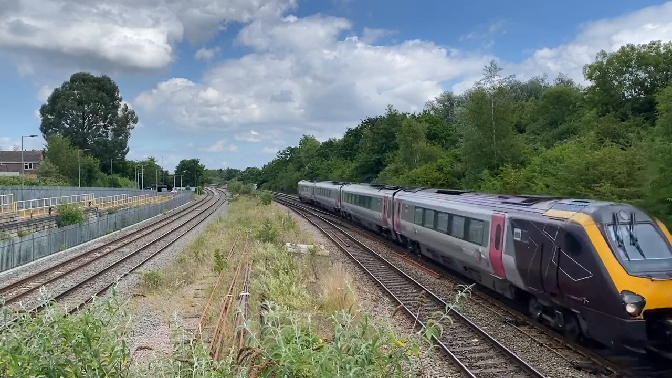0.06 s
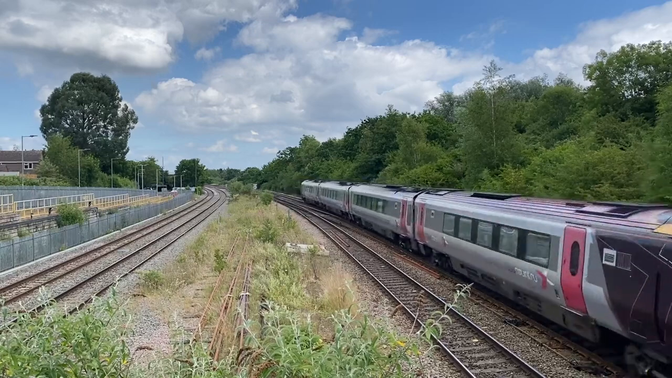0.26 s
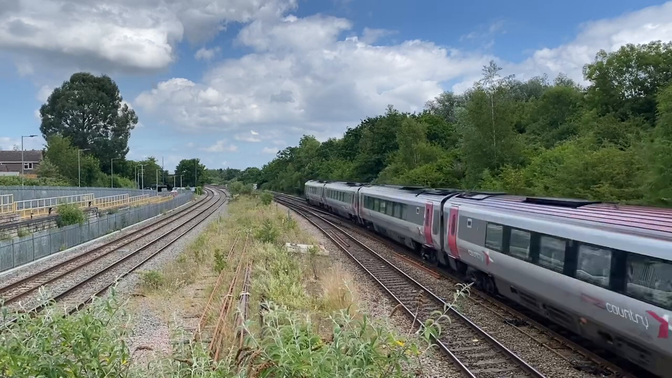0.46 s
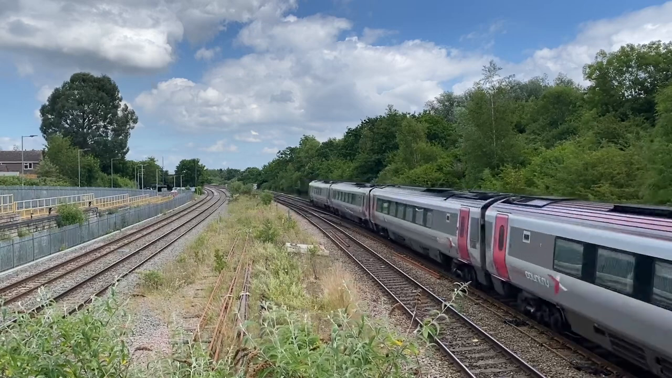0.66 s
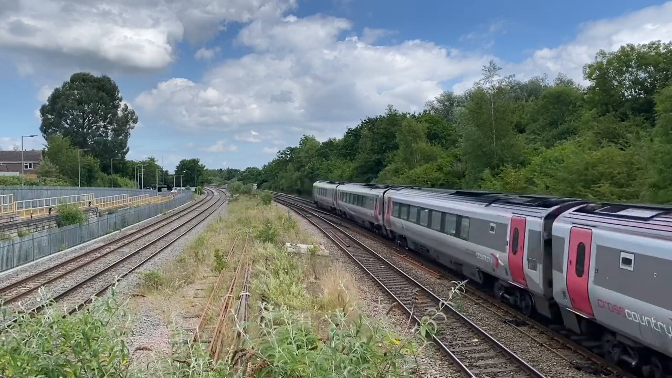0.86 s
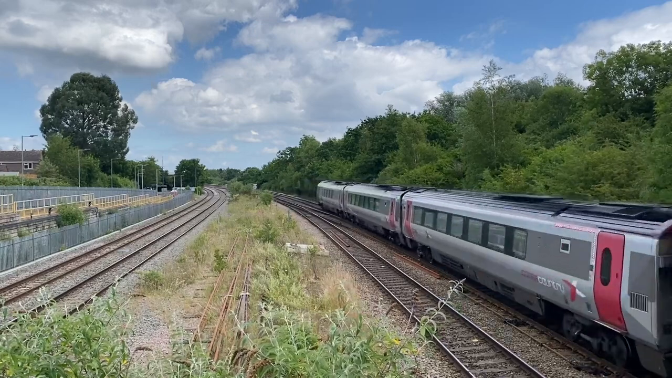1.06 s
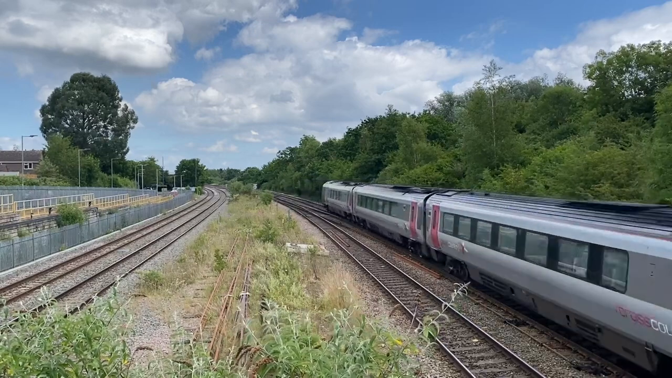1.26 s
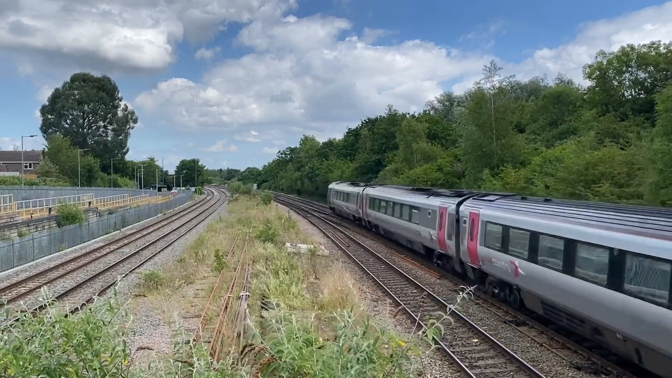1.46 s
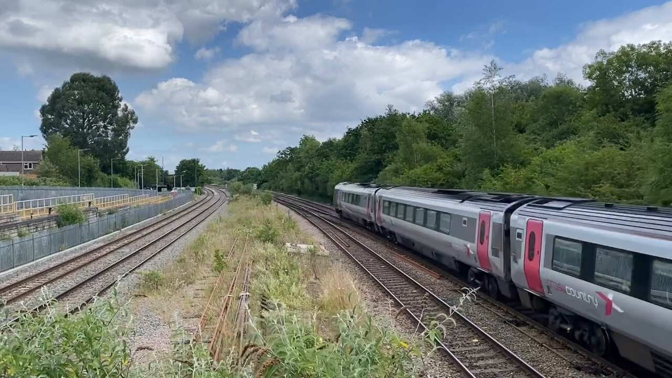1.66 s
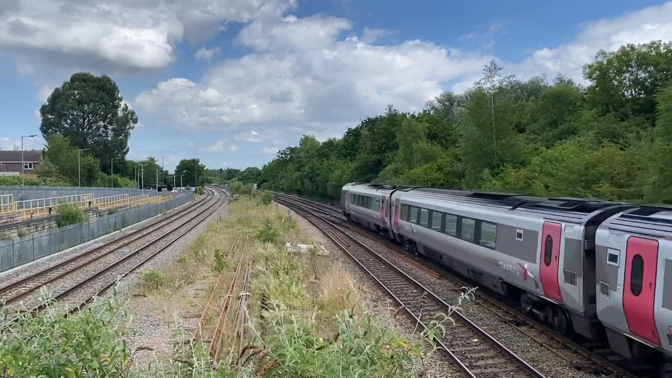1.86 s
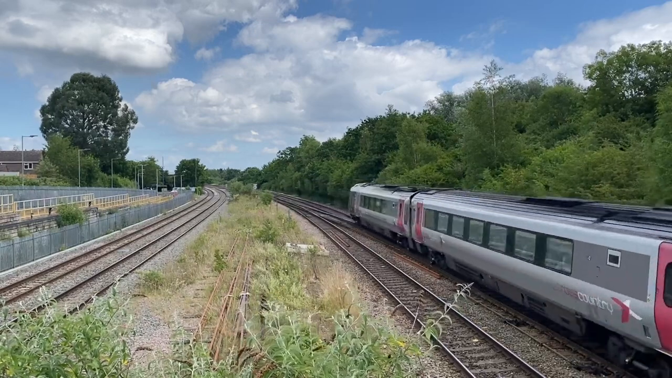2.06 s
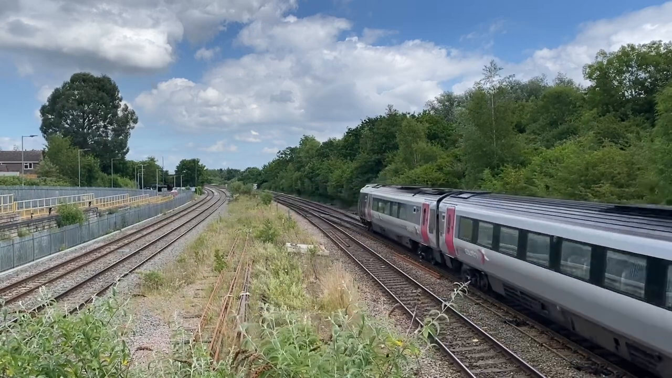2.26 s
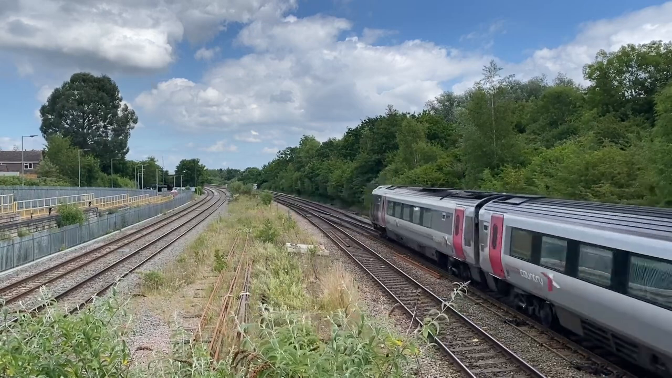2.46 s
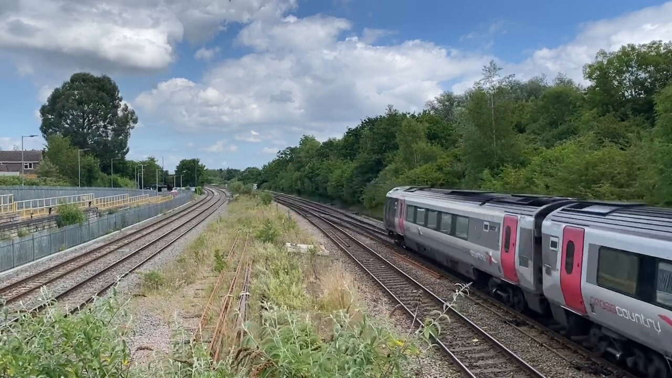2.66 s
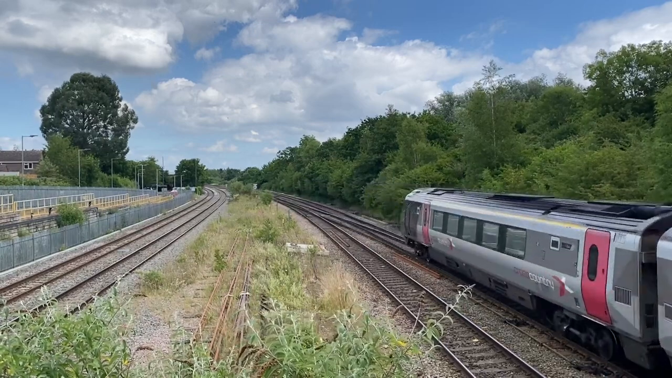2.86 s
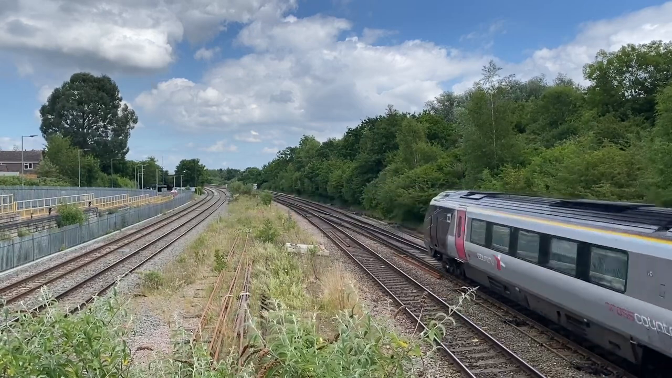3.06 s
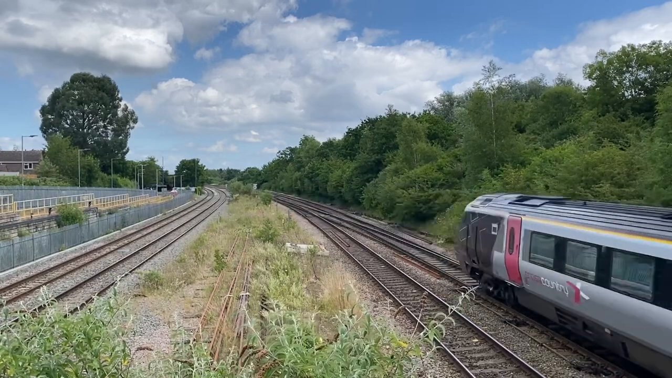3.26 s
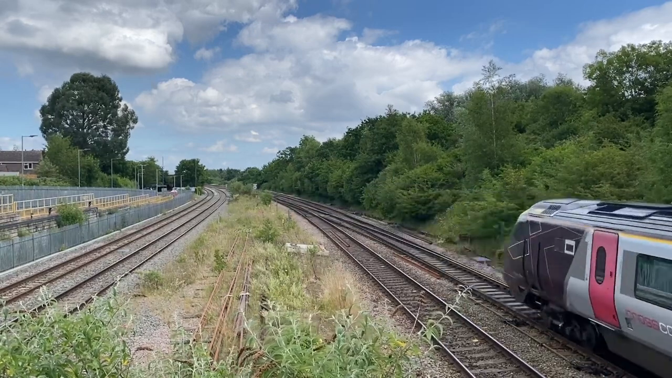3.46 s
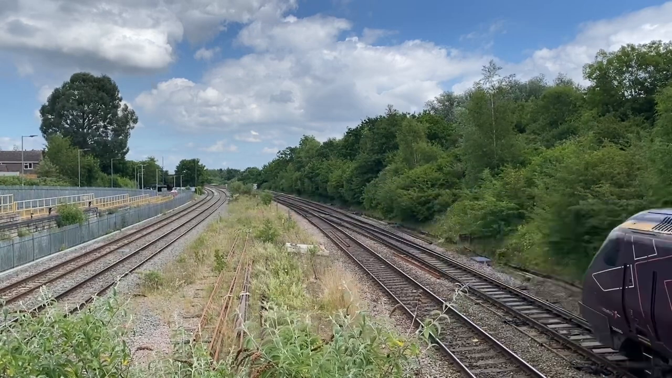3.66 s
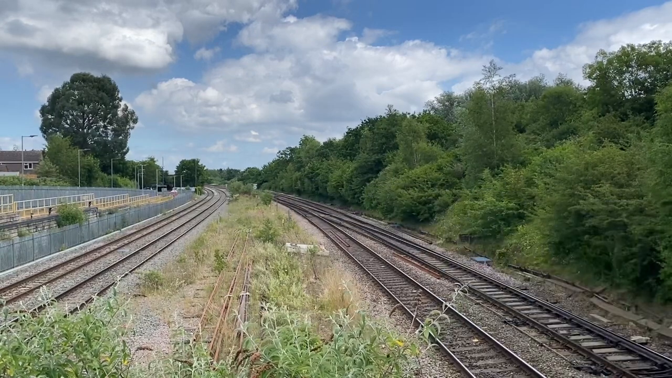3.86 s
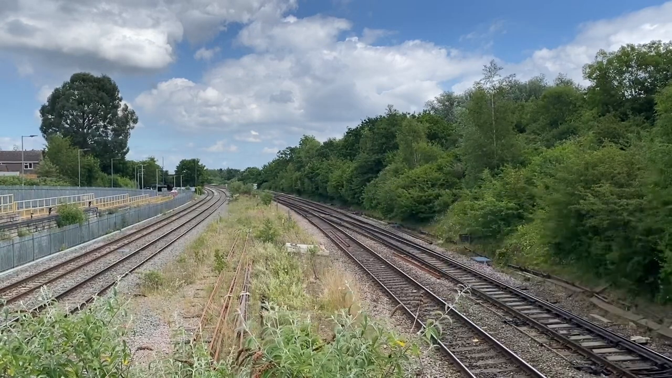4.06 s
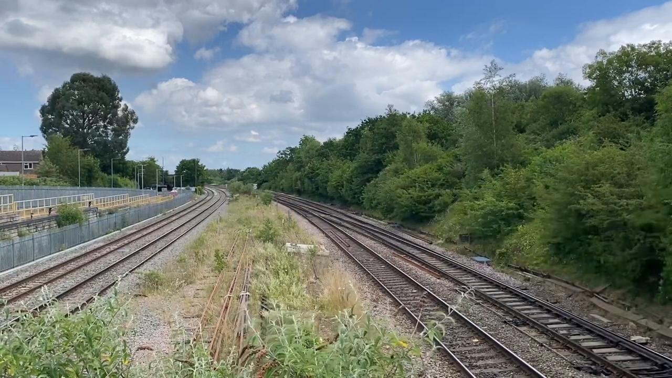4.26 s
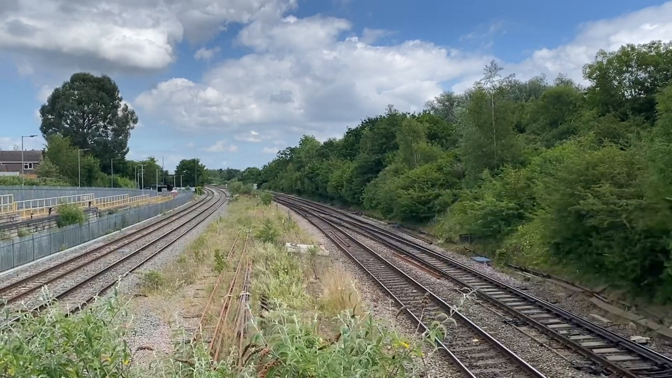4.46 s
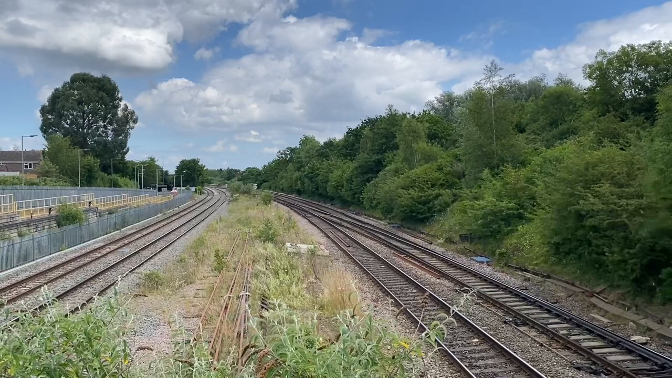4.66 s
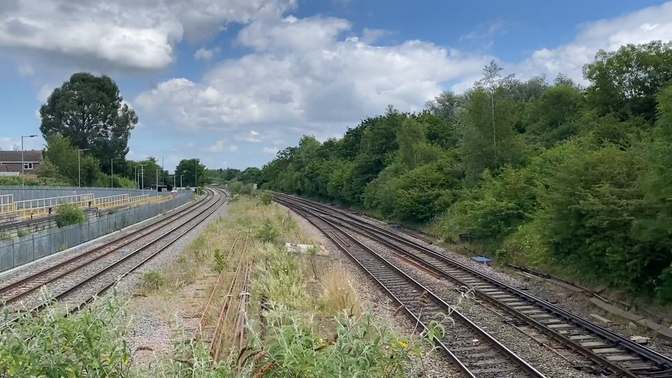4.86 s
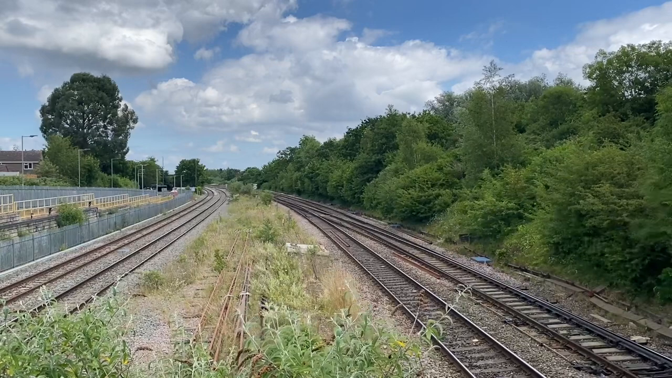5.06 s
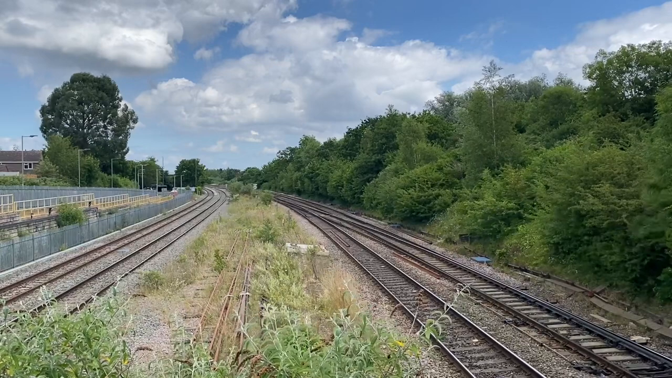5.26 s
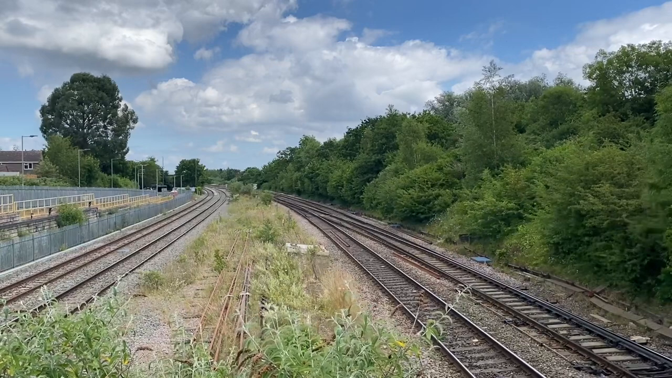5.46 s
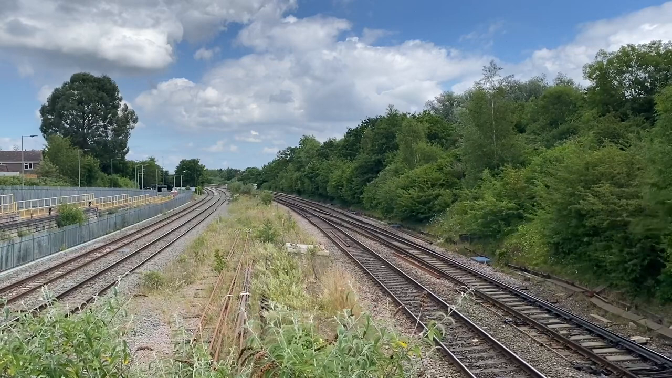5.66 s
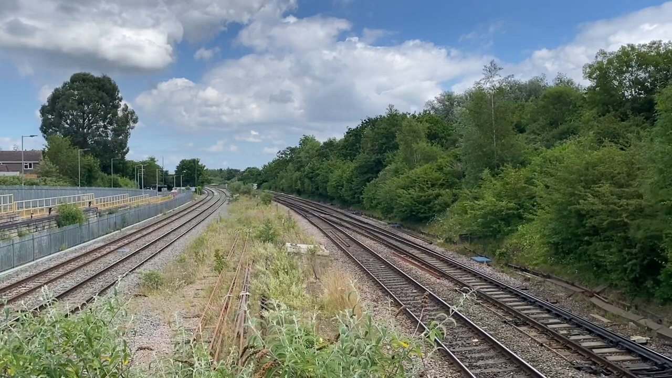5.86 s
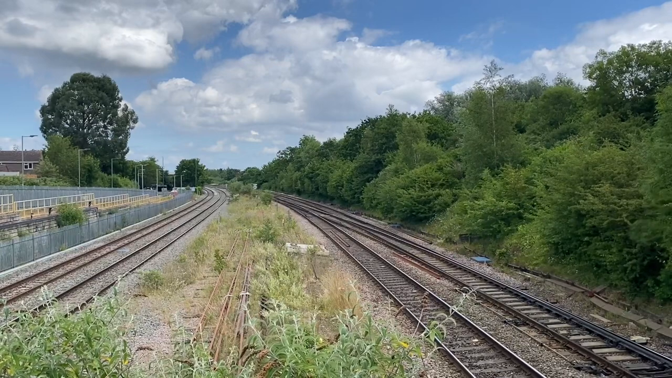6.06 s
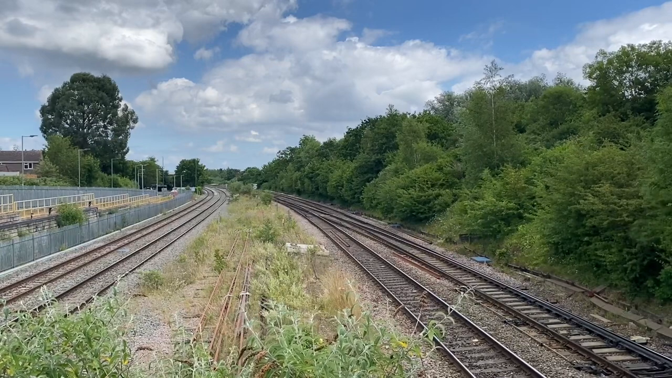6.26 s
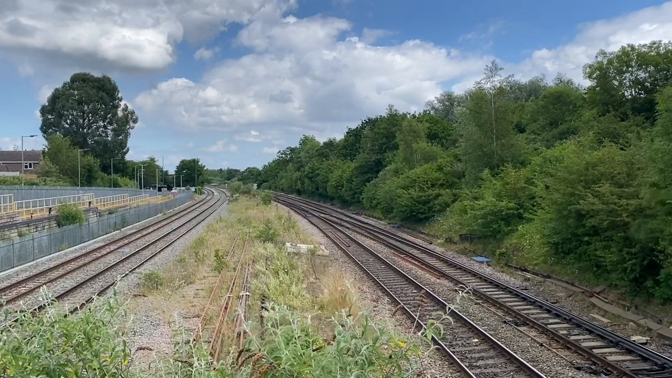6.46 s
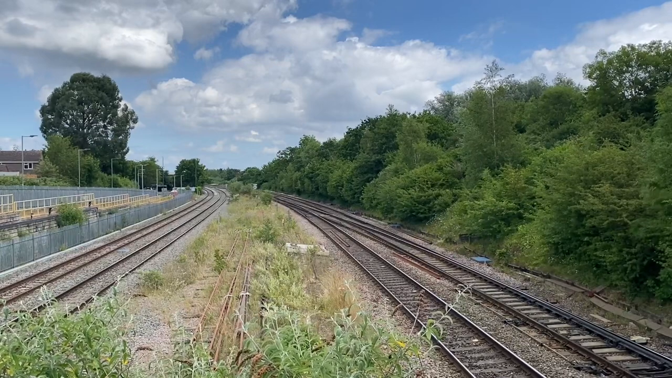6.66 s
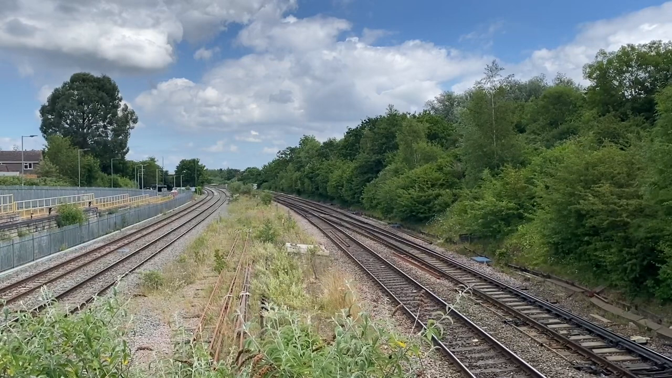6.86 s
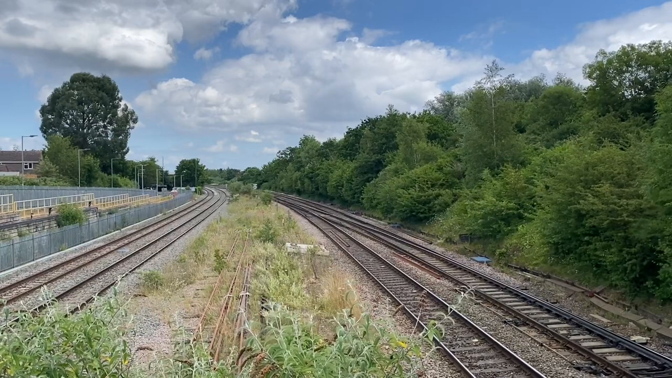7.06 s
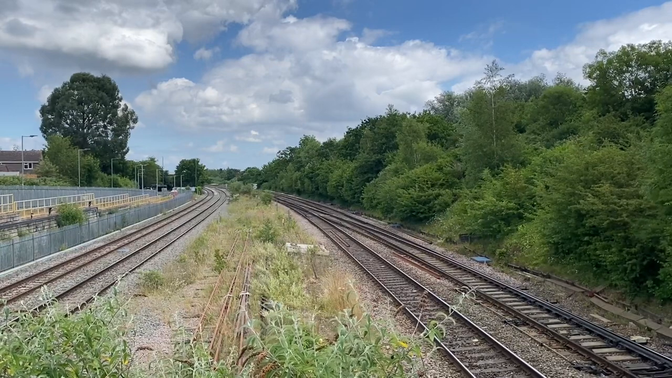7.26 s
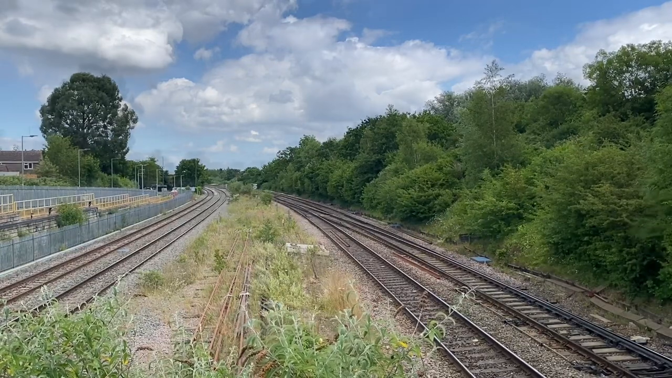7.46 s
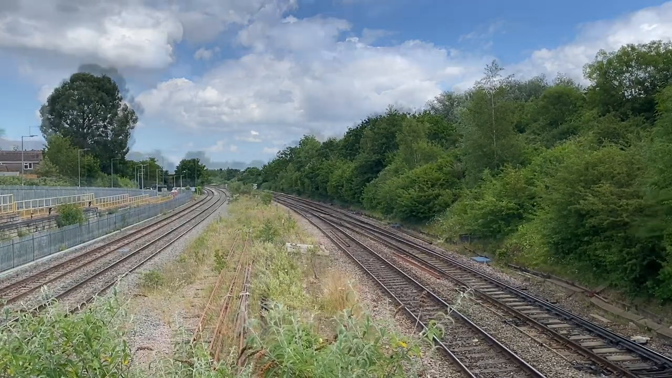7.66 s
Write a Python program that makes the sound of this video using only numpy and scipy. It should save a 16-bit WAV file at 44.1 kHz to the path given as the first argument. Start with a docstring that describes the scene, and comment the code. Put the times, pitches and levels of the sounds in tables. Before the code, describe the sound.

A four-car diesel passenger train rushes past very close, engines droning and dropping in pitch, wheels roaring and knocking, then recedes with a ticking wheel.

```python
"""Beside a railway line: a four-car diesel train passes a few metres to the right and runs off behind.
Each car's engine is a stack of crank-order sines, heard late by its distance, so pitch glides down.
Wheels are flickering coloured noises that fade with distance, with squeals and scraping swishes.
Knocks, pings and a flat spot that ticks once a turn ring steel modes; the rails hum and sing.
Two microphone ports hear it all with a small lag; loud peaks are rounded and the top is cut."""
import sys
import numpy as np
from scipy import signal
from scipy.fft import rfft, irfft, next_fast_len
from scipy.io import wavfile
from scipy.ndimage import uniform_filter1d

SR = 44100
rng = np.random.default_rng(int(sys.argv[2]) if len(sys.argv) > 2 else 0)


def log_audio(samples):
    """Write samples as a 16-bit WAV file to the path given in sys.argv[1]."""
    # one column per channel
    frames = np.atleast_2d(samples).T
    # limit to full scale, then quantise
    limited = np.clip(frames, -1, 1)
    pcm = np.round(limited * 32767).astype(np.int16)
    wavfile.write(sys.argv[1], SR, pcm)


N = 340211
T = np.arange(N) / SR
COARSE = 16  # engine tones and slow gains are worked out on every 16th sample
SPEED_MS, TRACK_M = 25.5, 8.46  # train speed m/s, nearest distance of the wheels m

# engine under each car: (t/s when abreast, crank rate f/Hz)
ENGINES = [(0.8, 30.72), (1.75, 30.44), (2.63, 30.68), (3.52, 30.36)]
# nose, then the bogies: (t/s when abreast, then strengths level/dB of
# rumble, rolling, rail ring, grind, hiss, air rush)
BOGIES = [(0.1, 6, -2, -19, -8, -10, -25), (0.45, -8, -3, 5.5, 1, 3, 10), (1.12, 4.5, 4.5, 7, 5.5, 4, 8),
          (1.38, 2, -8.5, 2, 0.5, 1.5, -6), (2.04, 1.5, -5, 2, 1.5, -1, -1),
          (2.3, 0, -1.5, -19, -2.5, -9.5, -4), (2.94, 4, -2.5, 2, 2.5, -4, -2.5),
          (3.22, -3, -3.5, -13, -3.5, -2.5, -6), (3.8, 3, -5.5, 5, 1.5, -2.5, -3.5)]
# swell of the receding roar: (t/s, rolling level/dB, rail ring and grind level/dB)
RECEDING = [(4.1, 3, -1), (4.35, 0.5, -1.5), (4.6, 7, 1.5), (5.0, 1, -4), (5.3, 1, -2.5), (5.55, 2, 0.5),
            (6.1, 3, -0.5), (6.45, 3, -2.5), (7.05, 0.5, -3), (7.4, 4.5, -5), (7.71, 0.5, -6)]
# the cab briefly screens the bright wheel noise: (t/s, level/dB)
NOSE_SCREEN = [(0, 0), (0.29, -1.5), (0.33, 0)]
# colour of the wheels' rolling noise: (f/Hz, relative density level/dB)
ROLLING_COLOUR = [(220, -1.5), (320, -3), (420, -2), (600, -3), (850, -0.5), (1100, -3.5), (1300, -8),
                  (1600, -17)]
# steel modes of the flat spot and the pings: (f/Hz, relative level/dB, 60 dB decay t/s)
TICK_MODES = [(1440, -33.5, 0.0135), (1742, 4, 0.034), (1984, -7, 0.05)]


def undb(db):
    """Decibels to amplitude ratio."""
    return 10 ** (np.asarray(db) / 20)


def curve(rows):
    """Amplitude gain that follows straight dB lines between (t/s, level/dB) points."""
    return undb(np.interp(T, *np.transpose(rows)))


def walk(rate, count=1):
    """Random levels held for 1 / rate seconds and slewed twice; spread near 1."""
    k = int(SR / COARSE / rate)
    held = np.repeat(rng.standard_normal((count, N // COARSE // k + 2)), k, axis=1)
    slewed = 1.3 * uniform_filter1d(uniform_filter1d(held, k), k)
    return np.repeat(slewed, COARSE, axis=1)[:, :N].squeeze()


def roar(colour, flicker_db, rate, count):
    """Two unrelated noises of one colour and joint rms 1, in bands that flicker on their own."""
    hz, db = np.transpose(colour)
    size = next_fast_len(N)
    pitch = np.log(np.arange(size // 2 + 1) * SR / size + 1)
    # position of each frequency among the overlapping triangular bands
    place = (pitch - np.log(hz[0])) / np.log(hz[-1] / hz[0]) * (count - 1)
    shape = undb(np.interp(pitch, np.log(hz), db, left=-99, right=-99))
    noise = rfft(rng.standard_normal((2, size))) * shape
    out = np.zeros((2, N))
    for k, level in enumerate(walk(rate, count=count)):
        triangle = np.clip(1 - abs(place - k), 0, 1)
        out += undb(flicker_db * level) * irfft(noise * triangle, size)[:, :N]
    return out / np.sqrt(np.mean(out ** 2))


def band(hz, width_hz, size):
    """Two unrelated noises in one resonance, joint rms 1."""
    x = signal.lfilter(*signal.iirpeak(hz, hz / width_hz, SR), rng.standard_normal((2, size)))
    return x / x.std()


def strikes(events, modes, push_s, detune, spread_db):
    """Each blow is a short push into steel modes, slightly detuned and rebalanced every time."""
    out, t = np.zeros(N + SR), T[:SR // 8]
    for s, db in events:
        ring = np.zeros(len(t))
        for (hz, mode_db, t60), chance in zip(modes, rng.standard_normal((len(modes), 3))):
            tone = np.sin(2 * np.pi * hz * (1 + detune * chance[1]) * t + chance[2])
            ring += undb(mode_db + spread_db * chance[0]) * tone * 1000 ** (-t / t60)
        ring *= np.minimum(t / push_s, 1)
        out[int(s * SR):][:len(t)] += undb(db) * ring / abs(ring).max()
    return out[:N]


def engines():
    """Crank orders of each engine, read at the time the sound left it: pitch falls as it passes."""
    # six cylinders fire three times a turn: multiples of the crank rate
    orders = [2, 3, 4, 5, 5.5, 6, 7, 8, 9, 10, 12, 14, 16, 18]
    # a row for each engine, a column for each order: relative level/dB
    exhaust = [
        [-34, -35.5, -35, -41, -45, -30, -53, -45, -37, -50, -48, -43, -37, -43],
        [-42, -19.5, -35, -32, -47, -24, -33, -37.5, -36.5, -46, -43, -39, -34.5, -50],
        [-46, -18.5, -36, -28.5, -45, -23, -27.5, -37, -30.5, -48, -44, -55, -46, -43],
        [-53, -18, -45, -29.5, -40, -19.5, -27.5, -37, -24, -42, -42, -43, -42.5, -45.5],
    ]
    # power of distance by which each order's direct sound fades
    fall_power = [1.4, 1.27, 2, 0.92, 0.74, 1.17, 0.91, 0.79, 1.5, 2.8, 0.95, 1.5, 0.76, 0.42]
    # gain of each order when the engine is straight ahead, an equal cut straight behind: level/dB
    ahead_gain = [0.1, 1.5, 0.1, 0.1, 0.1, 1, 1.5, 0.1, 3.2, 0.1, 0.1, 0.1, 0.1, 0.1]
    # share of each order that comes back off the trackside and carries further: level/dB
    echo_share = [-20, -16, -22, -8, -20, -16, -8, -4, -12, -12, -14, -20, -20, -25]
    # far-carrying share of each order as the early engine approaches: level/dB
    early_share = [7, -4, 5, -6, -20, -2.5, 6, -5, 0, -10, -10, -10, -10, -10]
    # the engines pick up a little as the train gets by: (start t/s, end t/s)
    rev_span = (4.05, 4.35)
    # the far drone swells and sinks: (t/s, level/dB)
    drone = [(4.1, 2), (4.35, 0), (4.6, 0), (4.85, -3), (5.3, 1.5), (5.75, 1.5), (6.2, 2), (6.6, -2),
             (7.2, -3), (7.71, -5)]
    exhaust_m, sound_ms = 7.193, 343  # nearest distance of the exhausts m, speed of sound m/s
    echo_fall = 0.47  # power of distance for the echoes
    shield_db = -10  # the cars behind screen a receding engine
    rev_share = 0.014  # rise of the crank rate
    early_abreast = ENGINES[1][0]  # the second engine is heard from far up the track

    t = T[::COARSE]
    out = np.zeros(len(t))
    extra_s = np.cumsum(np.interp(t, rev_span, (0, rev_share))) * COARSE / SR
    for (abreast, crank_hz), exhaust_db in zip(ENGINES, exhaust):
        sent = t - abreast
        for _ in range(4):  # close in on the time the sound left
            metres = np.hypot(exhaust_m, SPEED_MS * sent)
            sent = t - abreast - (metres - exhaust_m) / sound_ms
        hunting = .005 * walk(4)[::COARSE]  # the governor hunts a little
        turns = crank_hz * (sent + extra_s) + hunting + rng.random()
        far = np.clip(metres / 60, 0, 1)
        ahead = -SPEED_MS * sent / metres  # 1 straight ahead, -1 straight behind
        screen_db = shield_db * far * (sent > 0) * (abreast < ENGINES[-1][0])
        early = np.clip(ahead, 0, 1) ** 4 * (abreast == early_abreast)
        # echoes and moving air make each order swell and sink, more so far off
        waver = walk(9, count=len(orders))[:, ::COARSE]
        for k, db, fall, ahead_db, echo_db, early_db, w in zip(
                orders, exhaust_db, fall_power, ahead_gain, echo_share, early_share, waver):
            swell_db = 1.3 * far * w
            near = undb(ahead_db * ahead) * (exhaust_m / metres) ** fall
            echo = (undb(echo_db) + early * undb(early_db)) * (exhaust_m / metres) ** echo_fall
            gain = undb(db + swell_db + screen_db - 3.5 * far) * np.hypot(near, echo)
            # orders stay nearly in step, as one exhaust pulse
            phase = k * turns + .06 * rng.standard_normal()
            out -= gain * np.sqrt(2) * np.sin(2 * np.pi * phase)
    return curve(drone) * signal.resample_poly(out, COARSE, 1)[:N]


def distance(abreast):
    """Metres to a point of the train that is abreast at that time."""
    return np.hypot(TRACK_M, SPEED_MS * (T[::COARSE] - abreast))


def carry(places, db, fall):
    """Gain of sources (t/s when abreast, level/dB) that add in power and fade with distance."""
    power = sum(undb(2 * (db + own_db)) * (TRACK_M / distance(s)) ** (2 * fall) for s, own_db in places)
    return np.interp(T, T[::COARSE], np.sqrt(power))


def passing():
    """Near and far-carrying gain of each wheel layer, summed over the bogies."""
    # a row for each layer: (near level/dB, power of distance, far level/dB, power of distance)
    layer_carry = [(-28.5, 1.38, -39, 0.78), (-28, 0.98, -35.5, 0.5), (-38.5, 1.09, -43.5, 0.57),
                   (-41, 1.36, -53, 1.4), (-40.5, 1.34, -53, 0.85), (-46, 2.02, -61.5, 0.7)]
    times, *columns = np.transpose(BOGIES)
    gains = []
    for strengths, (near_db, near_fall, far_db, far_fall) in zip(columns, layer_carry):
        near_gain = carry(zip(times, strengths), near_db, near_fall)
        far_gain = carry(zip(times, strengths), far_db, far_fall)
        gains.append((near_gain, far_gain))
    return gains


def rumble(near_gain, far_gain):
    """Low rumble of the bogies, with another colour for the part that carries far."""
    # near and far colours: (f/Hz, relative density level/dB)
    near_colour = [(25, -42), (40, -33), (60, -7), (110, -4.5), (200, -3.5), (300, -9.5), (420, -24.5)]
    far_colour = [(25, -38), (40, -10), (60, -5.5), (85, -5.5), (110, -22), (135, -19), (200, -8.5),
                  (300, -13), (420, -33)]
    return near_gain * roar(near_colour, 2.4, 6, count=6) + far_gain * roar(far_colour, 3.5, 6, count=5)


def rolling(near_gain, far_gain):
    """Wheels roll on rough rail, which makes the mid-range roar come in surges."""
    # rolling heard from far along the track: (f/Hz, relative density level/dB)
    far_colour = [(150, -28), (220, -13), (330, -12), (385, -5), (450, -3), (690, -3.5), (850, -1.5),
                  (1090, -6.5), (1330, -20.5), (1600, -29)]
    times, roll_db, _ = np.transpose(RECEDING)
    surge = undb(np.interp(T, times, roll_db) + 1.0 * walk(24))
    near = near_gain * roar(ROLLING_COLOUR, 1.83, 14, count=6)
    return surge * (near + far_gain * roar(far_colour, 3.7, 18, count=6))


def rail_and_grind(rail_gain, grind_gain):
    """Ringing rail and grinding wheels, two noise bands that swell and sink together."""
    # colours: (f/Hz, relative density level/dB)
    rail_colour = [(1150, -1.5), (1450, -0.5), (1620, 2.5), (1780, 3), (1950, -0.7), (2100, -2.5),
                   (2500, -15)]
    grind_colour = [(1900, -3.5), (2300, 6.5), (2800, 4), (3300, -3), (3900, -16)]
    times, _, ring_db = np.transpose(RECEDING)
    swell = undb(np.interp(T, times, ring_db) + 0.83 * walk(22.09))
    rail = rail_gain * roar(rail_colour, 1.6, 18, count=3)
    grind = curve(NOSE_SCREEN) * grind_gain * roar(grind_colour, 2.65, 15, count=3)
    return swell * (rail + grind)


def hiss(wheel_gain, depth):
    """Bright flickering hiss of the wheels and of each engine's cooling air; depth scales the flicker."""
    # colour: (f/Hz, relative density level/dB)
    hiss_colour = [(2800, 3), (3500, 6), (4500, 7), (6500, 3.5), (8000, 2), (9500, -37)]
    # cooling air of each engine: relative level/dB when abreast
    fan_levels = [-32.5, -46, -46.5, -48]
    fans = carry(zip(np.array(ENGINES)[:, 0], fan_levels), 0, 4.4)
    gain = np.hypot(wheel_gain, fans)
    return curve(NOSE_SCREEN) * gain * roar(hiss_colour, 1.7 * depth, 12, count=5)


def air(depth):
    """Rush of air round the cars; depth scales its flicker and its very top."""
    # colour: (f/Hz, relative density level/dB)
    air_colour = [(7000, 1), (8400, -4.5), (9500, 4.5), (10700, 7), (12500, 1.5), (15000, -0.5), (16500, 4)]
    bright = roar(air_colour, 2.36 * depth, 14, count=6)
    dull = signal.sosfiltfilt(signal.butter(4, 13300, fs=SR, output="sos"), bright)
    return dull + np.clip(depth, 0, 1) ** 3.6 * (bright - dull)


def wheels():
    """All the steady noise of the passing bogies, cooling air and rushing air."""
    # flicker and top sink just after the train passes, then return: (t/s, treble flicker depth 0-1)
    treble_depth = [(0, 0.88), (4.3, 0.94), (5.2, 0.6), (7.71, 1)]
    depth = np.interp(T, *np.transpose(treble_depth))
    rumble_gain, roll_gain, rail_gain, grind_gain, hiss_gain, rush_gain = passing()
    out = rumble(*rumble_gain) + rolling(*roll_gain)
    out += rail_and_grind(np.hypot(*rail_gain), np.hypot(*grind_gain))
    out += hiss(np.hypot(*hiss_gain), depth)
    return out + np.hypot(*rush_gain) * air(depth)


def hum():
    """Narrow rail resonances, each swelling on its own, and a few steadier notes."""
    # overall course: (t/s, level/dB)
    hum_course = [(0, -29.5), (1.5, -40), (3, -42), (4.3, -42), (5, -36.5), (5.8, -40.5), (6.5, -40),
                  (7.2, -42.5), (7.71, -66)]
    # rough resonances: (f/Hz, width f/Hz, relative level/dB)
    hum_bands = [(389.6, 12, -5), (403.5, 6.8, -10), (453.3, 5.7, -7), (519, 8.8, -6.5), (589, 16, -10),
                 (735, 9.2, -4), (821, 7.6, -9), (927, 9.1, -10), (1058, 8.4, -6)]
    # steadier notes within the hum: (f/Hz, relative level/dB)
    hum_notes = [(409.3, -6), (452.2, -9), (513, -9)]
    notes = np.zeros(N)
    for hz, db in hum_notes:
        turns = hz * T + .15 * walk(3) + rng.random()
        notes += undb(db + 2.5 * walk(3)) * np.sqrt(2) * np.sin(2 * np.pi * turns)
    rough = sum(undb(db + 1.3 * walk(5)) * band(hz, width, size=N) for hz, width, db in hum_bands)
    rough[0] += notes  # into the direct sound only
    return curve(hum_course) * rough


def sing():
    """The rail sings roughly under the first cars: one resonance that flutters."""
    # course: (t/s, level/dB)
    sing_course = [(0, -50), (0.2, -42), (0.62, -32), (0.72, -36), (0.82, -32), (1.0, -45), (1.1, -34),
                   (1.23, -29), (1.32, -36), (1.6, -50), (1.7, -50), (2.5, -53), (7.71, -72)]
    return curve(sing_course) * undb(3.9 * walk(30)) * band(1790, 110, size=N)


def clatter():
    """Uneven knocks scattered among the timed ones, weaker as the last bogie draws away."""
    gap_s, level_db, spread_db, fall = 0.1, -16.5, 3.5, 0.92  # mean gap; fall is a power of distance
    chance = rng.random((80, 2)).T
    s = np.cumsum(gap_s * (.5 + chance[0]))
    away = np.hypot(1, SPEED_MS * np.maximum(s - BOGIES[-1][0], 0) / TRACK_M)
    db = level_db + spread_db * (2 * chance[1] - 1) - 20 * fall * np.log10(away)
    return [row for row in zip(s, db) if row[0] < T[-1]]


def knock_events():
    """Times and levels of the wheels' knocks, timed ones and clatter."""
    # timed knocks, loud and faint: (t/s, relative level/dB)
    timed_knocks = [(0.103, -3.5), (0.187, -4.5), (0.22, -9), (0.31, -3.5), (0.405, -10.5), (0.742, -3),
                    (0.868, -11), (1.04, -6.5), (1.154, -26), (1.224, -6), (1.455, -24), (1.723, -7.5),
                    (1.858, -8.5), (2.29, -8.5), (2.558, -10), (2.65, -7), (2.838, -10.5), (3.131, -8),
                    (3.295, -17), (3.459, -6.5), (3.547, -18), (4.204, -14.5), (4.543, -19), (4.75, -15),
                    (5.128, -16)]
    return timed_knocks + clatter()


def knock_rings(events):
    """The steel modes that each knock sets ringing."""
    # modes: (f/Hz, relative level/dB, 60 dB decay t/s)
    knock_modes = [(453.7, -8, 0.012), (716.5, -1, 0.069), (880, -2, 0.086), (1073, -4.5, 0.015)]
    return undb(-2) * hollow(strikes(events, knock_modes, 0.0042, 0.054, 3.2))


def jolts(events):
    """Each knock shakes out a short, rough burst of rolling noise."""
    jolt_db, jolt_s = -7, 0.022  # level against the knock, time scale of the burst
    gain, u = np.zeros(N + SR), T[:SR // 8] / jolt_s
    for s, db in events:
        gain[int(s * SR):][:len(u)] += undb(db + jolt_db) * u * np.exp(-u ** 2)
    return gain[:N] * roar(ROLLING_COLOUR, 0.72, 30, count=4)


def pings():
    """Passing wheels ping the rail: high steel modes with a softer push than the flat spot's."""
    # pings, strong and faint: (t/s, relative level/dB)
    ping_events = [(0.1846, -28), (0.221, -26), (0.3153, -27), (0.4316, -25), (0.471, -27), (0.5099, -28),
                   (0.5663, -26), (0.6014, -19), (0.7195, -28), (0.7553, -22), (0.8212, -19), (0.911, -25),
                   (0.9758, -26), (1.0387, -26), (1.1265, -21.5), (1.1635, -24), (1.2772, -29),
                   (1.5141, -29), (1.6972, -18), (1.8913, -25), (1.991, -17), (2.0887, -17.5),
                   (2.9384, -34), (3.1838, -30), (3.3001, -26), (3.6183, -25.5), (3.6777, -27),
                   (3.7989, -29), (4.0987, -22), (4.3796, -23)]
    return undb(4) * strikes(ping_events, TICK_MODES, 0.0021, 0.026, 2.7)


def swishes():
    """Axles swish over rough rail: bright noise and a scrape resonance, a fast rise and a soft fall."""
    # axles: (t/s, relative level/dB, time scale t/s, scrape f/Hz, scrape level/dB against the swish)
    swish_events = [(0.318, -22.5, 0.059, 5100, -5), (0.416, -22, 0.068, 3230, -6),
                    (0.7, -23, 0.087, 5300, 2), (0.79, -21.5, 0.068, 4640, 1.5),
                    (1.06, -25, 0.047, 2820, 4), (1.146, -25, 0.033, 2390, 10),
                    (1.32, -30.5, 0.04, 2530, 3), (1.686, -27.5, 0.093, 2400, 5),
                    (1.884, -27, 0.06, 2400, 1), (2.158, -22, 0.044, 2770, -4.5),
                    (2.234, -29, 0.1, 3440, 0.5), (2.779, -24, 0.037, 2470, -3.5),
                    (2.863, -27, 0.072, 4000, 0), (3.066, -26, 0.038, 2920, -4.5),
                    (3.131, -29, 0.126, 3800, 0.5), (3.609, -26.5, 0.052, 2590, 4),
                    (3.78, -27.5, 0.047, 2800, 2), (4.15, -29.5, 0.071, 2680, 9),
                    (4.21, -29.5, 0.1, 2470, 2), (4.54, -32, 0.093, 4700, 2.5),
                    (4.633, -35, 0.076, 4260, -1)]
    # colour: (f/Hz, relative density level/dB)
    swish_colour = [(1800, 4), (2700, 3), (4000, 4), (5500, 5), (8000, 1), (11000, -10), (16000, -28)]
    out, bright = np.zeros((2, N)), roar(swish_colour, 1.7, 30, count=5)
    for s, db, length, hz, scrape_db in swish_events:
        at = slice(int(s * SR), int(s * SR) + SR // 4)
        u = T[:SR // 4] / length
        stroke = undb(db - 9.5) * np.minimum(4 * u, 1) * np.exp(-2.2 * u ** 2)
        scrape = undb(scrape_db) * band(hz, hz / 8.0, size=SR // 4)
        out[:, at] += stroke * (bright[:, at] + scrape)
    return out


def squeals():
    """Wheel flanges squeal against the rail: rough, narrow resonances that swell early and die away."""
    # squeals: (start t/s, length t/s, level/dB)
    squeal_events = [(0.346, 0.94, -42), (1.353, 0.25, -38.5), (1.967, 0.33, -43.5), (2.243, 0.49, -45),
                     (2.78, 0.57, -51), (3.086, 0.68, -46), (3.747, 0.44, -48)]
    # flange resonances: (f/Hz, width f/Hz, relative level/dB)
    flange_bands = [(8170, 270, 1), (10360, 140, -1), (14840, 400, -5)]
    rub = np.zeros(N)
    for s, length, db in squeal_events:
        progress = np.clip((T - s) / length, 0, 1)
        rub += undb(db) * np.sin(np.pi * progress ** 0.32) ** 2
    return rub * sum(undb(db + 2.4 * walk(25)) * band(hz, width, size=N) for hz, width, db in flange_bands)


def hollow(x):
    """A narrow gap opens gradually in the spectrum of the receding sound."""
    # gap: (low edge f/Hz, high edge f/Hz)
    gap_edges = (419, 443)
    # opening: (start t/s, end t/s)
    gap_span = (4.2, 5.6)
    gap = signal.sosfiltfilt(signal.butter(2, gap_edges, "band", fs=SR, output="sos"), x)
    return x - np.interp(T, gap_span, (0, 1)) * gap


def flat_spot():
    """A flat spot on one wheel strikes once a turn; a smaller flat follows less evenly."""
    # strikes of the main flat: (t/s, relative level/dB)
    flat_events = [(4.4935, -26), (4.571, -25), (4.6638, -29), (4.7586, -27), (4.8534, -35), (4.9506, -36),
                   (5.0314, -33), (5.1322, -31), (5.224, -36), (5.3203, -25.5), (5.4133, -24.5),
                   (5.5067, -27), (5.6005, -26), (5.6914, -34), (5.7844, -36), (5.88, -30), (5.9717, -34),
                   (6.0666, -30), (6.1594, -34), (6.2517, -32), (6.3455, -32), (6.4383, -41), (6.5306, -33),
                   (6.6238, -36), (6.716, -35), (6.8089, -33), (6.9022, -33.5), (6.994, -36), (7.087, -38),
                   (7.184, -31), (7.3243, -37), (7.5028, -39), (7.5487, -40), (7.6405, -39)]
    turn_s, second_turn, second_db = 0.09295, 0.62, -11  # wheel turn; lag in turns and level of the second
    s, db = np.transpose(flat_events)
    chance = rng.standard_normal((len(s), 2)).T
    late = s + turn_s * (second_turn + .08 * chance[0])
    events = [*flat_events, *zip(late, db + second_db + 2.5 * chance[1])]
    return undb(8.5) * strikes(events, TICK_MODES, 0.001, 0.011, 1.0)


def clicks():
    """Small dry clicks close by: a few milliseconds of bright crackle."""
    # clicks: (t/s, relative level/dB)
    click_events = [(5.1775, -21), (5.185, -31.5), (7.1848, -42)]
    bright_band = signal.butter(2, [1700, 8000], "band", fs=SR, output="sos")
    bright = signal.sosfilt(bright_band, rng.standard_normal((2, N)))
    gain = sum(undb(db) * (T > s) * np.exp(-np.maximum(T - s, 0) / 0.0016) for s, db in click_events)
    return bright * gain


def ports(direct, scattered):
    """Left and right share the direct sound and get the scattered sound with opposite sign; left lags."""
    # bands: (f/Hz, likeness 0-1, left minus right level/dB, left lag besides the path/rad)
    port_bands = [(30, .97, -.9, .05), (90, .96, -1.1, .12), (180, .86, -1.2, .2), (300, .75, -1.8, .4),
                  (450, .65, -3, .8), (750, .8, -4.5, 1.3), (1300, .75, -3.5, .7), (1900, .4, -1, 1.4),
                  (2500, .45, .3, 2.1), (4000, .4, .8, -.1), (5600, .35, .5, -1.8), (7000, .8, .3, -4.3),
                  (9000, .95, .1, -4.3), (16000, .95, .1, -4.3)]
    path_s = 0.0002423  # the left port is this much further from the track
    size = next_fast_len(N + 512)
    hz = np.arange(size // 2 + 1) * SR / size
    band_hz, *columns = np.transpose(port_bands)
    like, pan_db, turn = (np.interp(np.log(hz + 1), np.log(band_hz), c) for c in columns)
    like = np.clip(like, 0, 1)
    shared = rfft(direct, size) * np.sqrt((1 + like) / 2)
    opposed = rfft(scattered, size) * np.sqrt((1 - like) / 2)
    lag = np.exp(-1j * (2 * np.pi * hz * path_s + turn))
    left = (shared + opposed) * undb(pan_db / 2) * lag
    right = (shared - opposed) * undb(-pan_db / 2)
    return irfft(np.array([left, right]), size)[:, :N]


def scene():
    """The whole pass, heard by the two ports, swinging to the right and sinking at the very end."""
    # balance as the train moves round to the right: (t/s, left minus right level/dB besides the ports)
    swing = [(0, 1.7), (0.7, 0.4), (1.5, 0.1), (4.2, -0.5), (4.7, 0), (7.71, -0.2)]
    fade_s, fade_db = 0.28, -4.5
    knocks = knock_events()
    roaring = hollow(undb(2.5) * (wheels() + jolts(knocks)))
    direct, scattered = roaring + hum() + sing() + swishes() + squeals() + clicks()
    blows = knock_rings(knocks) + pings() + flat_spot()
    heard = ports(direct + engines() + blows, scattered)
    fade = undb(fade_db * np.clip(1 - (T[-1] - T) / fade_s, 0, 1))
    swing_db = np.interp(T, *np.transpose(swing))
    return fade * undb(np.array([swing_db, -swing_db]) / 2) * heard


def record(dry):
    """The phone rounds the loudest peaks and cuts the top."""
    low_pass = signal.ellip(10, .2, 80, 15750, fs=SR, output="sos")
    return signal.sosfilt(low_pass, np.tanh(0.63 * dry) / 0.56)


dry = scene()
out = record(dry)
log_audio(out)
```